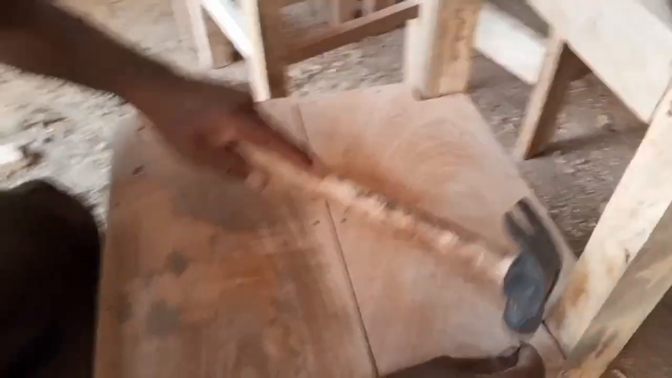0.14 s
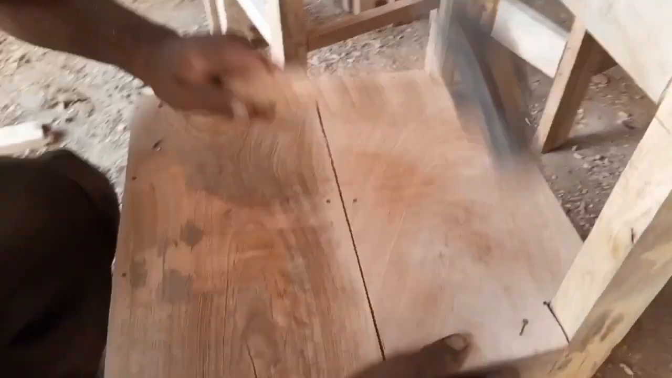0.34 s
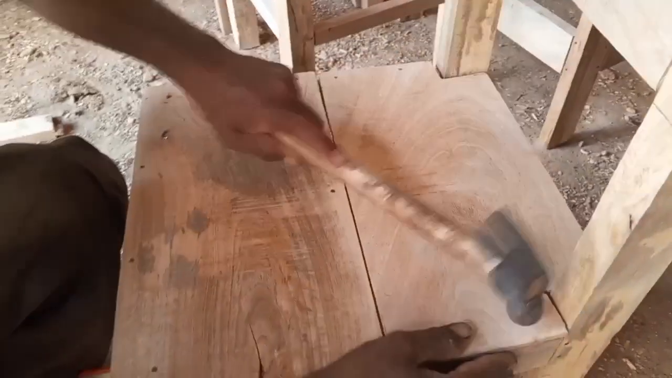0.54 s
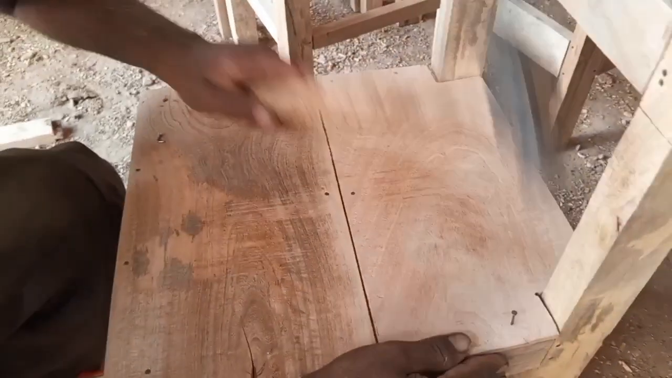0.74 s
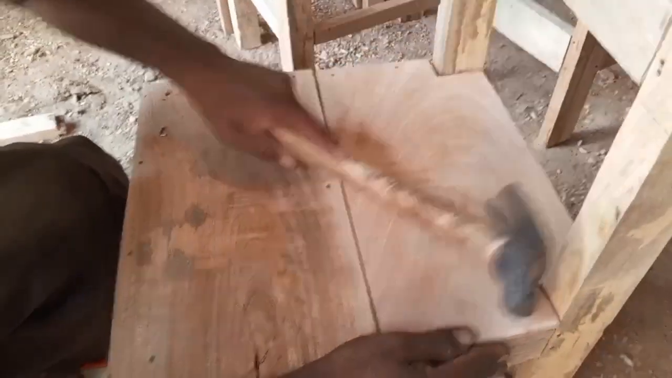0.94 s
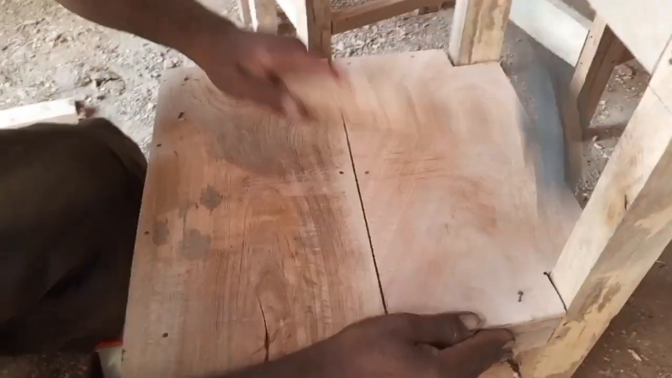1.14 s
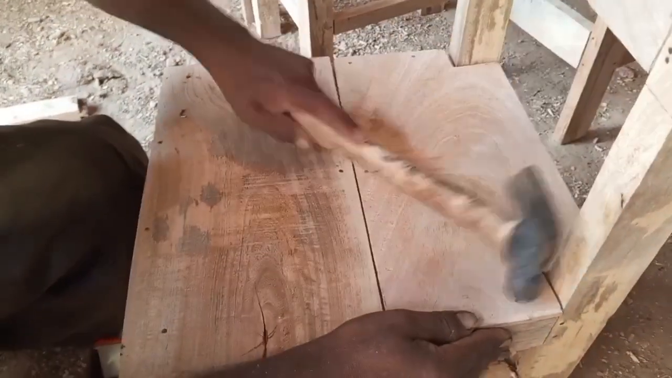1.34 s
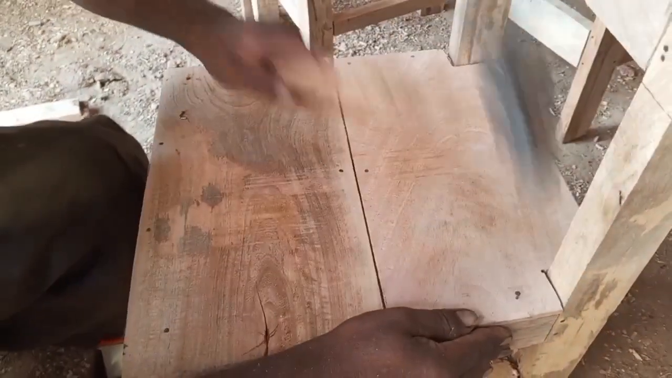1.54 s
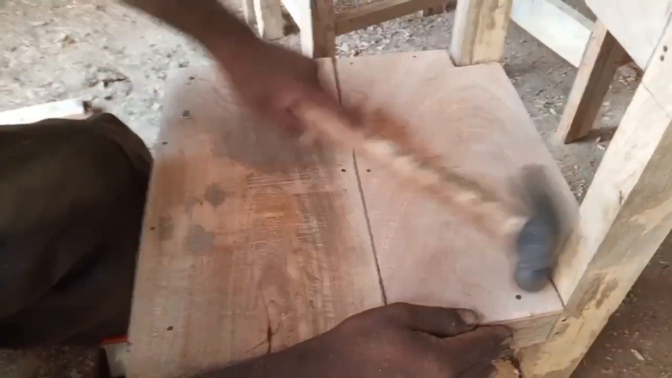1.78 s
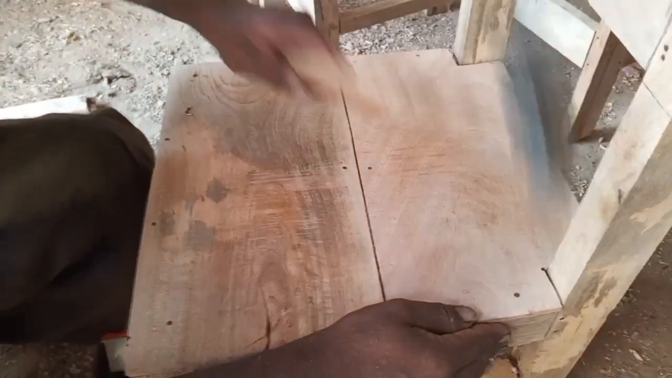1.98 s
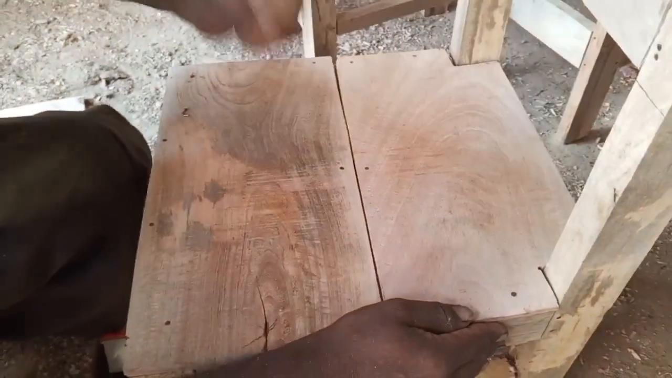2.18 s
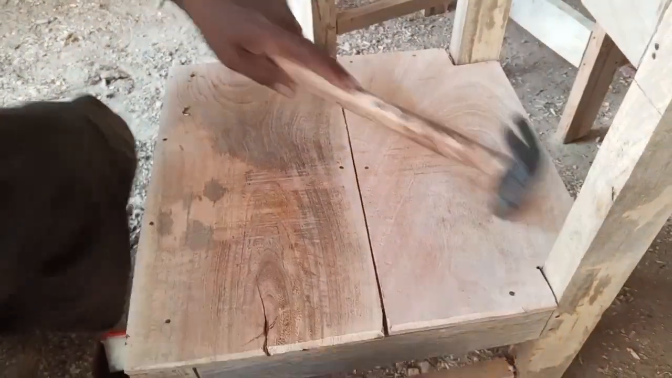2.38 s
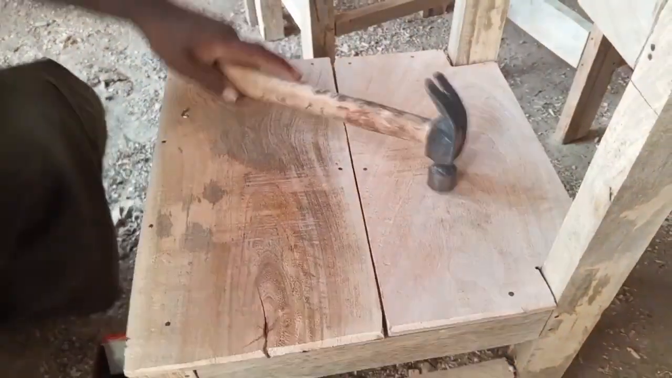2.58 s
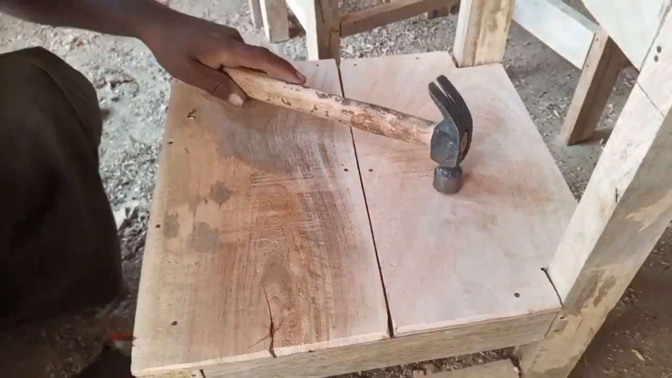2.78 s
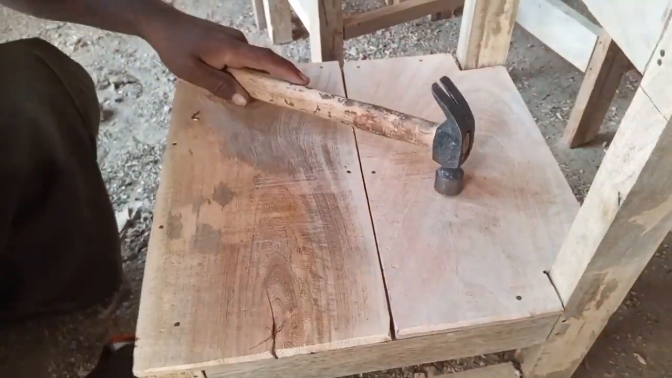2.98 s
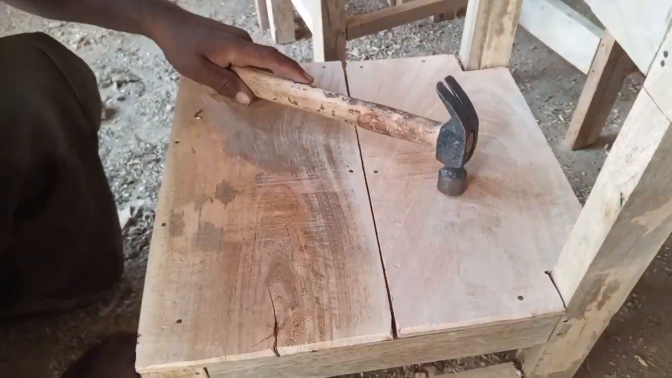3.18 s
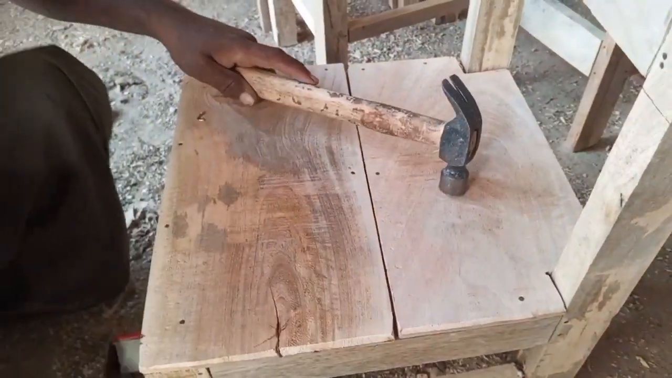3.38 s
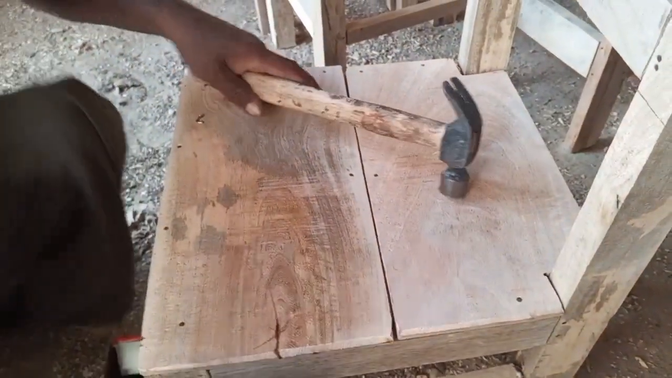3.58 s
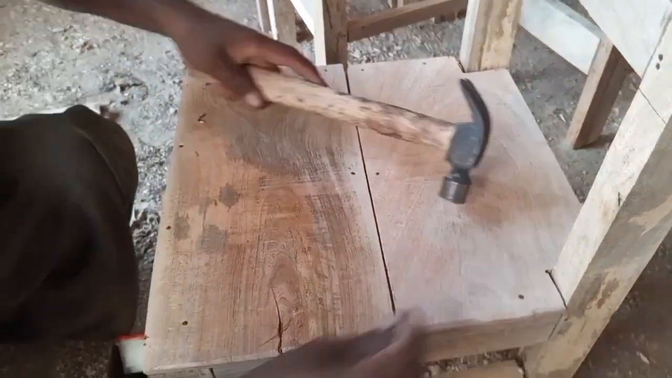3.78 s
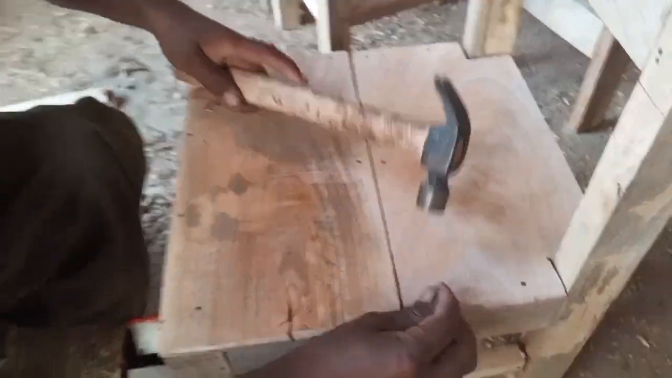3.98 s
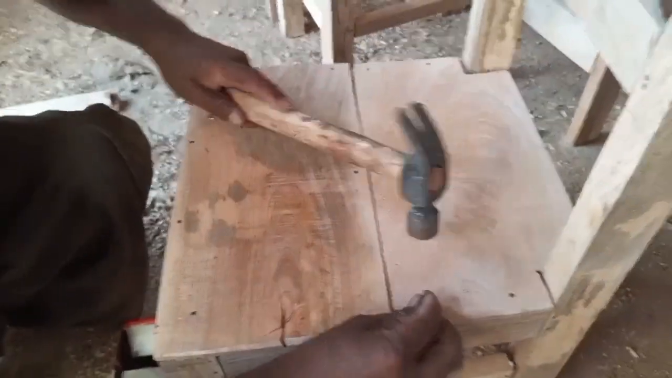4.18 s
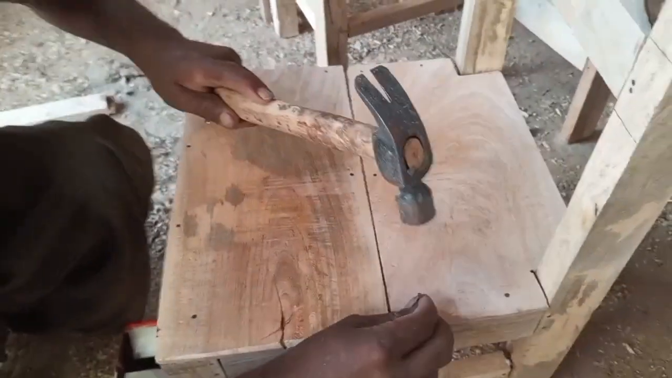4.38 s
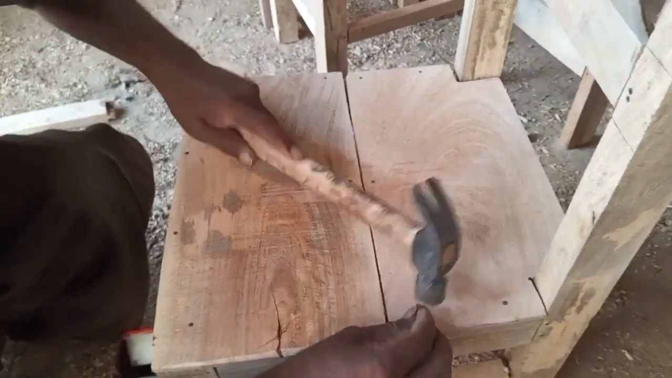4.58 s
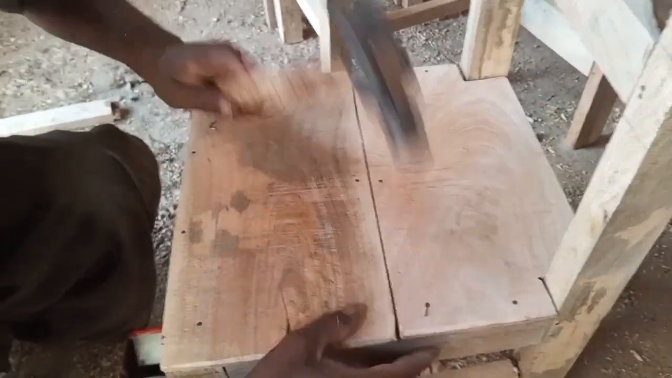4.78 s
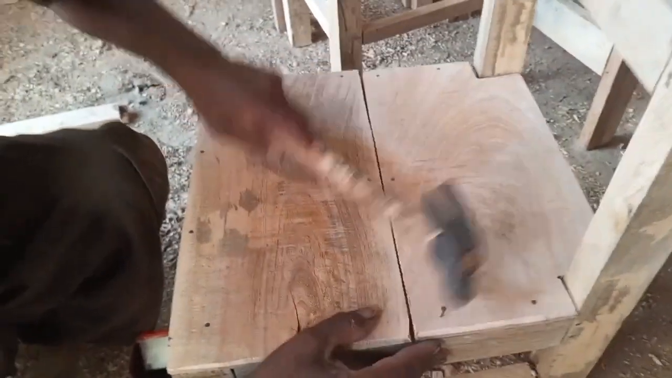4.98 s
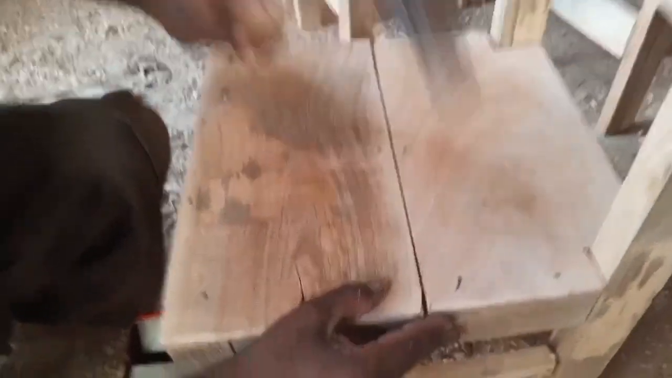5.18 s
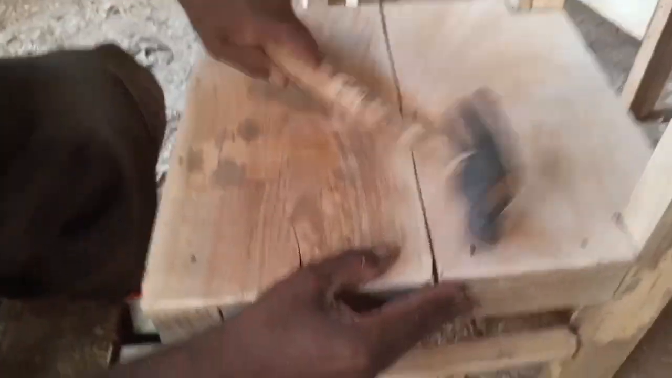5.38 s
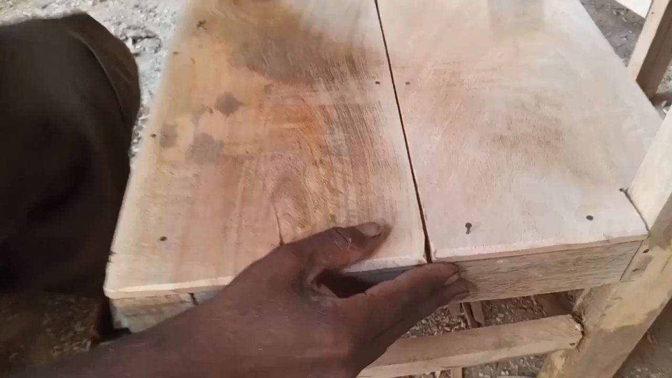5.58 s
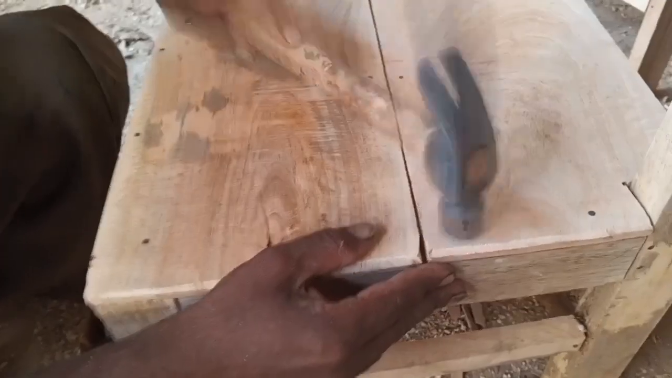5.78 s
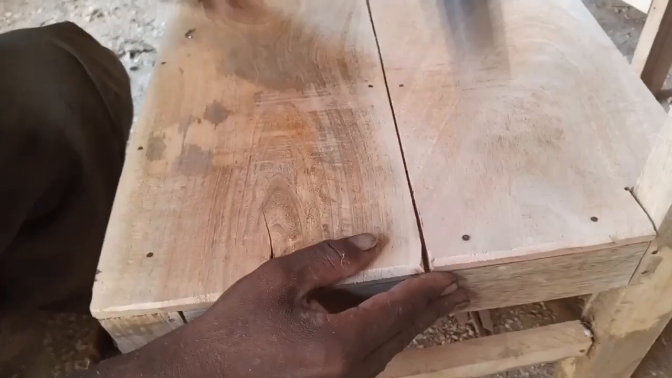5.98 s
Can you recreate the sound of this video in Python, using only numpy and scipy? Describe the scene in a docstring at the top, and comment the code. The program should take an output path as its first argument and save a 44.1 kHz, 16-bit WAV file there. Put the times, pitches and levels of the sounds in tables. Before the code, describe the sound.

Close up in an open workshop, a claw hammer strikes nails into a board seat. Six dry, hard knocks come a little under half a second apart, growing louder and crackling at the edges. The hammer is laid down softly, then there is a pause of faint wind, tiny ticks and jingling nails. Hammering resumes with a weak double tap and three strong blows, each with a small bounce and brief echo.

```python
"""Hammering nails into a chair seat

A claw hammer drives nails into the board seat of a chair in an open workshop. Each blow is a tick and
rough contact that ring seat, hammer head and frame, with a crack of noise and a decaying-noise shed echo.
Ringing touches make loose nails jingle; grains make scrapes; shaped noise and sines make yard, wind and hum.
The recorder overloads on the blows, ducks its gain and lets it rise again while the echo dies."""
import sys
import numpy as np
from scipy import signal
from scipy.fft import rfft, irfft
from scipy.io import wavfile
from scipy.ndimage import uniform_filter1d

SR = 44100
rng = np.random.default_rng(int(sys.argv[2]) if len(sys.argv) > 2 else 0)


def inscribe(sig):
    """Save sig as 16-bit PCM at rate SR to the path in sys.argv[1].

    A 1-D sig is mono; a 2-D sig holds one channel per row.
    Samples are clipped to [-1, 1] before scaling.
    """
    pcm = np.round(np.clip(np.atleast_2d(sig).T, -1, 1) * 32767)
    wavfile.write(sys.argv[1], SR, pcm.astype(np.int16))


N = 266805  # length in samples

# Hammer blows; strength_db scales the whole blow, the other levels are relative parts of it:
# start_s, strength_db, pitch_hz (nail and board), body_db (wood), crack_db, steel_db, thud_hz, thud_db,
# main_mode_db, frame_hz, frame_db, low_frame_hz, low_frame_db, boom_db, echo_db
HAMMER_BLOWS = [(.1835, 3, 1463, 11, -1, -14, 383, 4.5, 11.5, 865, -4, 407, -7, -18, -5.5),
                (.624, 8.5, 1420, 14, 2.5, -8.5, 388, -4, 8.5, 1377, 0, 690, -8.5, -26, 0.5),
                (1.049, 21.5, 1993, 12, 12.5, -41, 351, -9.5, 9.5, 1396, -6, 648, -16, -22.5, -2),
                (1.444, 13, 1344, 4.5, 6.5, -14, 410, -9, 6.5, 1420, -6.5, 666, -7, -34, 3),
                (1.869, 16, 1635, 8, 6.5, -16, 518, -11, -1.5, 1140, -16, 830, -16, -19, 0.5),
                (2.327, 29.5, 1570, 11, 10, -10.5, 448, -4, 2, 393, -10.5, 680, -21, -15, -4),
                (4.618, -4.5, 1790, 21.5, 8, -31, 548, 4, 13, 970, 5.5, 520, -8, -13, -1.5),
                (4.659, 4.5, 2090, 11.5, -3, -46, 535, -8.5, 5, 2380, -48, 1040, -29, -15.5, -41),
                (5.016, 14.5, 2150, -8, 5, -30, 510, -46, -8, 1175, -12, 2680, -9, -22.5, 0.5),
                (5.448, 26, 2590, 11.5, 9.5, -43, 494, -16, -13, 2050, -13.5, 2730, -20, -29, -7.5),
                (5.871, 12, 1980, 1, 11, -46, 382, -31, -7, 810, -4, 490, -19, -45, -4)]
# The head bounces back on to the wood after a blow:
# start_s, strength_db, pitch_hz, body_db, crack_db, thud_db, main_mode_db
HEAD_REBOUNDS = [(0.24, -13, 1520, 1, -10, -16, 0), (.650, 0.5, 840, 2, -8, -20, 0),
                 (1.921, 8, 820, -5, -21, -13, 0.5), (2.364, 10, 894, 3, -19, -10, 8),
                 (4.625, -3.5, 575, 5, -10, -6.5, -6), (5.057, 1.5, 1730, 5, -4, -27, 8),
                 (5.147, -19, 1134, 22, -10, -20, -4), (5.175, -16.5, 1200, 15.5, -5, -17, -12),
                 (5.496, 8, 824, 13.5, -2, 0, 5.5), (5.899, -13.5, 860, 9, 7, -6, -1)]
REBOUND_STEEL_DB, REBOUND_FRAME_DB, REBOUND_BOOM_DB, REBOUND_ECHO_DB = -45, -16, -7, -3
REBOUND_THUD_HZ = 435
# Modes of the seat boards: mode_hz, level_db (relative), t60_s
SEAT_MODES = [(403, -22, 0.27), (472, -20, 0.047), (636, 12, 0.036), (858.6, 14, 0.051), (1155, -13, 0.49),
              (1400, -15, 0.026), (1658, 13, 0.037), (2106, 22, 0.016), (2575, 16, 0.022),
              (2840, 23, 0.011), (3000, -40, 0.026)]
MAIN_MODE = 3  # row of the seat modes that takes main_mode_db
# Modes of the hammer head and handle: mode_hz, level_db (relative), t60_s
HEAD_MODES = [(868.8, -35, 0.45), (2370, -46, .4), (6480, -13.5, 0.017), (11390, -55, .06),
              (14300, -34, 0.06), (5480, -47, 0.45)]
# Boom of the whole chair: mode_hz, level_db (relative), t60_s
CHAIR_BOOM = [(123.8, -4, 0.23), (155, 0, 0.096), (223, -7, 0.1), (266.4, -9.5, .12)]
CONTACT_DB = -10  # how hard a contact drives a mode
THUD_T60_S, KNOCK_LONGEST_S = 0.041, 0.035  # ring of the low thud; longest t60 of the knock
KNOCK_ECHO_DB = 0.5  # extra level of the pitched knock in the echo send
FRAME_T60_S, FRAME_RING_CYCLES = 0.45, 28.0  # how long the frame is shaken; its ring in cycles
RATTLE_ROUGH_DB = 3.5  # RMS unevenness of the frame's rattle

# Echo of the shed: centre_hz, t60_s
SHED_DECAY = [(100, 0.28), (500, 0.28), (2000, 0.25), (5000, 0.24), (9000, 0.11), (15000, 0.21)]
SHED_DB = -17

# Hammer laid on the seat: start_s, strength_db, brightness_db (per octave)
HAMMER_SET_DOWN = [(2.815, -41, 9.5), (2.829, -29, 3)]
# Modes of the hammer resting on the damped seat: mode_hz, level_db (relative), t60_s
RESTING_MODES = [(613, -6.5, 0.12), (710, 7, 0.04), (1750, -8.5, 0.026), (2350, -9, 0.021)]
SET_DOWN_CONTACT_S = 0.0035

# Hammer face dragged over the board: peak_s, peak_db, rise_s, fall_s
FACE_DRAG = [(2.968, -53.5, 0.012, 0.029), (3.006, -51.5, 0.02, 0.021)]
# Chair shifted on the ground: peak_s, peak_db, rise_s, fall_s
CHAIR_SHIFT = [(5.73, -38, 0.015, 0.03), (5.77, -39, 0.02, 0.03), (5.81, -43, 0.02, 0.025)]
# Dry ticks close to the microphone: start_s, level_db (click before its filter)
CLOSE_TICKS = [(0.513, -40), (2.9911, -47), (3.0115, -28.5), (3.03, -48), (3.1353, -44), (3.1414, -42),
               (3.1544, -64)]

# Modes of the loose nails: mode_hz (of the onset ring), level_db (relative), t60_s
NAIL_MODES = [(4900, -5, .08), (5050, -6, .08), (5280, -6, .08), (6070, -7, .08), (6470, -1, .1),
              (7070, -8, .07), (7270, -7, .07), (7630, -2, .08), (8380, -6, .07), (8600, 0, .1),
              (9230, -2, .08), (9370, -6, .07), (9710, -3, .08), (9975, 0, .1), (10760, -1, .08),
              (11270, -5, .07), (11370, -2, .1)]
# Jingling spells: start_s, end_s, level_db
JINGLE_SPELLS = [(0, 0.185, -62.5), (1.15, 1.435, -57.5), (1.503, 1.757, -60), (3.435, 4.053, -59.5),
                 (5.155, 5.455, -62.5), (5.596, 5.886, -68)]

# Faint narrow tones that swell and stop: peak_s, peak_db, rise_s, fall_s, pitch_hz
TONE_SWELLS = [(1.4, -54, 0.029, 0.019, 1400), (2.78, -52, 0.048, 0.016, 970),
               (0.393, -53.5, 0.066, 0.018, 330)]

# Gusts on the microphone, on top of the steady breeze: peak_s, peak_db, rise_s, fall_s
WIND_GUSTS = [(.27, -48.5, 0.12, 0.042), (.77, -47, 0.11, 0.1), (1.58, -46, 0.064, 0.03),
              (2.04, -58, 0.11, 0.015), (2.62, -49.5, 0.048, 0.1), (4.7, -50, 0.035, 0.027),
              (5.12, -52, 0.11, 0.082), (5.38, -54, 0.13, 0.089), (5.7, -46.5, 0.3, 0.66)]
BREEZE_DB = -59.5
# Gusts that thump the microphone: start_s, peak_db, pitch_hz
WIND_THUMPS = [(3.31, -39, 85), (3.409, -50, 61.9), (3.574, -50.5, 84.5), (3.659, -44.5, 83),
               (4.025, -46, 79), (4.091, -42, 74.4), (4.242, -41.5, 73.4), (5.169, -34, 96)]
# Low hums: peak_s, peak_db, rise_s, fall_s, pitch_hz
LOW_HUM = [(5.81, -37, 0.19, 0.05, 58), (5.98, -38, .06, .08, 60), (5.68, -39, .12, .07, 112),
           (5.36, -45, .1, .07, 97)]
HUM_WIDTH_HZ = 6.0  # twice the RMS wander of its pitch
# A far hiss near 1.8 kHz: peak_s, peak_db, rise_s, fall_s
HISS_SWELL = [(3.3, -56, 0.8, 0.98)]
# Yard noise level over time: time_s, level_db
YARD_LEVEL = [(0.0, -57.5), (6.05, -52.5)]
# Yard noise colour: frequency_hz, density_db (relative, per Hz)
YARD_COLOUR = [(60, -8), (120, 14.5), (300, 10.5), (800, 8.5), (1750, 5), (2500, 4.5), (3200, -1.5),
               (5000, -7), (8000, -11.5), (11000, -16), (13000, -32), (16000, -45)]

CUTOFF_HZ = 17000  # the recorder's top cut


def blows(rows, ring_db, cycles):
    """A tick and a few ms of rough contact ring wood and steel; returns near sound and echo send."""
    out = np.zeros((2, N + SR))
    t = np.arange(SR // 2) / SR
    # steel meets steel over a fraction of a ms
    tick = np.where(t < 0.0004, np.sin(np.pi * t / 0.0004) ** 2, 0)
    tick /= tick.sum()
    for (s, strength_db, hz, body_db, crack_db, steel_db, thud_hz, thud_db, main_db,
         frame_hz, frame_db, low_hz, low_db, boom_db, echo_db) in rows:
        rough = rng.standard_normal((2, len(t))) * np.exp(-t / 0.0021) * (1 - np.exp(-t / 0.0052))
        rough /= np.sqrt(np.sum(rough[0] ** 2))
        contact = 0.097 * tick + 0.36 * band(rough[0], 330, 4400)

        knock = strike(contact, hz, min(cycles / hz, KNOCK_LONGEST_S))
        thud = amp(thud_db) * strike(tick, thud_hz, THUD_T60_S)
        body = rms_one(band(band(rough[1], 920, 2870), 480, 3320)) / np.sqrt(len(t))
        crack = amp(crack_db) * band(rough[1], 5230, 8640)
        seat = seat_ring(contact, hz, ring_db, main_db)
        steel = sum(amp(steel_db + db) * ring(rough[0], mode_hz, t60) for mode_hz, db, t60 in HEAD_MODES)
        boom = sum(amp(db) * strike(tick, mode_hz, t60) for mode_hz, db, t60 in CHAIR_BOOM)
        hit = thud + amp(body_db) * body + seat + crack + steel + amp(boom_db) * boom
        frame = amp(frame_db) * rattle(t, frame_hz) + amp(low_db) * rattle(t, low_hz)

        near = knock + hit + frame
        far = amp(echo_db) * (amp(KNOCK_ECHO_DB) * knock + hit)
        at = round(s * SR)
        out[:, at:at + len(t)] += amp(strength_db) * np.array([near, far])
    return signal.sosfilt(signal.butter(3, 190, "high", fs=SR, output="sos"), out[:, :N])


def rebounds():
    """Rows for the head's bounces, laid out like blows; the lower rattle is an octave down."""
    return [(s, db, hz, body_db, crack_db, REBOUND_STEEL_DB, REBOUND_THUD_HZ, thud_db, main_db,
             hz, REBOUND_FRAME_DB, hz / 2, REBOUND_FRAME_DB, REBOUND_BOOM_DB, REBOUND_ECHO_DB)
            for s, db, hz, body_db, crack_db, thud_db, main_db in HEAD_REBOUNDS]


def seat_ring(contact, hz, ring_db, main_db):
    """Seat modes ring under the contact; those far from the blow's pitch are barely driven."""
    out = 0
    for k, (mode_hz, mode_db, t60) in enumerate(SEAT_MODES):
        near_db = -7 * abs(np.log2(mode_hz / hz))
        level_db = ring_db + mode_db + near_db + main_db * (k == MAIN_MODE) + rng.normal(0, 1.0)
        out = out + amp(level_db) * strike(contact, mode_hz, t60)
    return out


def strike(contact, hz, t60):
    """One mode rung by a contact, with an energy that does not hang on the contact's chance colour."""
    energy = t60 * SR / (4 * np.log(1000))  # of a decaying sine of height 1
    return amp(CONTACT_DB) * rms_one(ring(contact, hz, t60)) * np.sqrt(energy / len(contact))


def rattle(t, hz):
    """The shaken frame rattles unevenly in one resonance; unit energy."""
    uneven = amp(RATTLE_ROUGH_DB * rms_one(band(rng.standard_normal(len(t)), 8.5, 74)))
    envelope = amp(-60 * t / FRAME_T60_S) * (1 - np.exp(-t / 0.0047))
    shake = uneven * rng.standard_normal(len(t)) * envelope
    return rms_one(ring(shake, hz, FRAME_RING_CYCLES / hz)) / np.sqrt(len(t))


def shed(x):
    """Dense echo: noise that builds up over tens of ms and dies at its own rate in each half octave."""
    t = np.arange(int(0.8 * SR)) / SR
    edges = 60 * 2 ** np.arange(0, 8.4, 0.5)
    echo = 0
    for low, high in zip(edges, edges[1:]):
        t60 = at_hz(SHED_DECAY, np.sqrt(low * high))
        echo = echo + band(rng.standard_normal(len(t)), low, high) * amp(-60 * t / t60)
    echo *= 1 - np.exp(-t / 0.07)
    return signal.fftconvolve(x, echo / np.sqrt(np.sum(echo ** 2)))[:N]


def set_down():
    """Each mode of the resting hammer swells over the soft contact, then dies."""
    out = 0
    for s, strength_db, bright_db in HAMMER_SET_DOWN:
        t = np.maximum(np.arange(N) / SR - s, 0)
        onset = np.minimum(t / SET_DOWN_CONTACT_S, 1)
        for hz, db, t60 in RESTING_MODES:
            tilt_db = bright_db * np.log2(hz / RESTING_MODES[1][0])
            level = amp(strength_db + db + tilt_db - 60 * t / t60)
            out = out + level * onset * np.sin(2 * np.pi * hz * t + rng.uniform(0, 2 * np.pi))
    return out


def grains(per_s):
    """Random impulses of random height, so many a second on average."""
    return rng.standard_normal(N) * (rng.random(N) < per_s / SR)


def drag():
    """Dense grains excite the steel as the hammer face drags over the board."""
    g = grains(900)
    steel = band(g, 2030, 2700) * 2.6 + ring(g, 4770, 0.016) * 0.032 + ring(g, 6500, 0.009) * 0.019
    return swell(FACE_DRAG) * rms_one(steel)


def chair_shift():
    """Denser grains ring the seat as the chair shifts, its lower modes strongest."""
    g = grains(3000)
    seat = sum((600 / hz) ** 0.8 * ring(g, hz, 0.035) for hz, _, _ in SEAT_MODES)
    return swell(CHAIR_SHIFT) * rms_one(seat)


def close_ticks():
    """Single clicks, band-passed and left dry."""
    ticks = np.zeros(N)
    for s, db in CLOSE_TICKS:
        ticks[round(s * SR)] = amp(db)
    return band(ticks, 7200, 16000)


def jingle():
    """Nails touch densely at random; each touch swells and fades in one mode, over a haze of high noise."""
    t, out = np.arange(N) / SR, 0
    level = sum(amp(db) * np.clip(np.minimum(t - start, end - t) / 0.02, 0, 1)
                for start, end, db in JINGLE_SPELLS)
    for hz, mode_db, t60 in NAIL_MODES:
        touches = (rng.random(N) < 70.0 / SR) * amp(rng.normal(-5, 3.5, N)) * rng.choice([-1, 1], N)
        # a short first ring softens the onset; the second is tuned slightly sharp of it
        soft = ring(level * touches, hz, 0.03) * 15 / (0.03 * SR)
        out = out + amp(mode_db) * ring(soft, hz * 1.002, t60)
    haze = uniform_filter1d(level, size=2000) * rms_one(band(rng.standard_normal(N), 8400, 8700))
    return out + amp(-11) * haze


def faint_tones():
    """Narrow noise at each pitch under its swell."""
    return sum(swell([row]) * rms_one(ring(rng.standard_normal(N), hz, 0.21)) for *row, hz in TONE_SWELLS)


def wind():
    """Lumpy low rumble: a steady breeze plus gusts."""
    lumps = amp(3.3 * rms_one(band(rng.standard_normal(N), 17, 19)))
    rumble = rms_one(band(lumps * rng.standard_normal(N), 72.5, 142))
    return rumble * (amp(BREEZE_DB) + swell(WIND_GUSTS))


def thumps():
    """Single soft thumps: low sines under short bells that peak 15 ms after the start."""
    t = np.arange(N) / SR
    return sum(amp(db) * np.exp(-((t - s - 0.015) / 0.018) ** 2) * np.sin(2 * np.pi * hz * (t - s))
               for s, db, hz in WIND_THUMPS)


def hum():
    """Low sines whose pitch wanders together, each under its swell."""
    t = np.arange(N) / SR
    waver = np.cumsum(HUM_WIDTH_HZ / 2 * rms_one(band(rng.standard_normal(N), 2.5, 11))) / SR
    return sum(swell([row]) * np.sqrt(2) * np.sin(2 * np.pi * (hz * t + waver)) for *row, hz in LOW_HUM)


def yard():
    """Smooth far noise shaped by its colour, with a narrow far hiss."""
    hz = np.maximum(np.fft.rfftfreq(N, 1 / SR), 1)
    far = rms_one(irfft(rfft(rng.standard_normal(N)) * amp(at_hz(YARD_COLOUR, hz)), N))
    hiss = rms_one(band(rng.standard_normal(N), 1595, 2130))
    return amp(curve(YARD_LEVEL)) * far + swell(HISS_SWELL) * hiss


def amp(db):
    """Decibels to amplitude factor."""
    return 10 ** (np.asarray(db) / 20)


def rms_one(x):
    """Scale to an RMS of one."""
    return x / np.sqrt(np.mean(x ** 2) + 1e-20)


def curve(rows):
    """Level in dB at every sample; silent outside the rows."""
    s, level = np.transpose(rows)
    return np.interp(np.arange(N) / SR, s, level, left=-150, right=-150)


def swell(rows):
    """Sum of bell-shaped gains, each with its own rise and fall."""
    t = np.arange(N) / SR
    return sum(amp(db) * np.exp(-((t - s) / np.where(t < s, rise_s, fall_s)) ** 2)
               for s, db, rise_s, fall_s in rows)


def at_hz(points, hz):
    """Read a table at a frequency, along a logarithmic frequency axis."""
    table_hz, value = np.transpose(points)
    return np.interp(np.log(hz), np.log(table_hz), value)


def ring(clicks, hz, t60):
    """A resonator: a unit click sets a decaying sine of height 1 ringing."""
    r, w = amp(-60 / (t60 * SR)), 2 * np.pi * hz / SR
    return signal.lfilter([0, np.sin(w)], [1, -2 * r * np.cos(w), r * r], clicks + 1e-18)


def band(x, low_hz, high_hz):
    """Band-pass filter."""
    return signal.sosfilt(signal.butter(2, [low_hz, high_hz], "band", fs=SR, output="sos"), x)


def bell(x, hz, width_hz, gain_db):
    """Bell equaliser: a peak or notch of the given gain."""
    a, w = amp(gain_db / 2), 2 * np.pi * hz / SR
    q = np.sin(w) * width_hz / hz / 2
    middle = -2 * np.cos(w)
    return signal.lfilter([1 + q * a, middle, 1 - q * a], [1 + q / a, middle, 1 - q / a], x)


def smooth(x, time_s):
    """One-pole smoothing with the given time constant."""
    r = np.exp(-1 / (time_s * SR))
    return signal.lfilter([1 - r], [1, -r], x)


def gain_control(x, threshold_db, share, release_db_s, attack_s, sense_s):
    """Gain falls by a share of the level above the threshold, a little late, and climbs back steadily."""
    level = 10 * np.log10(smooth(x ** 2, sense_s) + 1e-12)
    climb = release_db_s * np.arange(N) / SR
    cut = np.clip(share, 0, 1) * np.maximum(level - threshold_db, 0)
    cut = np.maximum.accumulate(cut + climb) - climb
    return x * amp(-smooth(cut, attack_s))


def suppressor(x, floor_db, span_db, depth_db, sense_s):
    """Louder sound is lifted against sound near the noise floor, so tails end abruptly."""
    level = 10 * np.log10(smooth(band(x, 300, 3300) ** 2, sense_s) + 1e-12)
    return x * amp(depth_db * np.clip((level - floor_db) / span_db, 0, 1))


def scene():
    """Blows and their echo in front, small handling sounds, then wind and yard behind."""
    near, far = blows(list(HAMMER_BLOWS) + rebounds(), ring_db=-19.5, cycles=53.0)
    hammering = near + amp(SHED_DB) * shed(far)
    handling = set_down() + drag() + chair_shift() + close_ticks() + jingle()
    background = faint_tones() + wind() + thumps() + hum() + yard()
    return (hammering + handling + background)[None]


def record(dry):
    """Microphone port tone, two gain controls, noise suppressor, overload, bass and top cut."""
    # the port has a deep dip at 4 kHz and a peak above
    dip = signal.sosfilt(signal.butter(2, [3250, 4700], "stop", fs=SR, output="sos"), dry[0])
    x = bell(dip + amp(-15.5) * dry[0], 6770, 1300, 6.8)
    # a quick gain control, then a slower one
    x = gain_control(x, threshold_db=-34.5, share=0.42, release_db_s=877, attack_s=0.0001, sense_s=0.000067)
    x = gain_control(x, threshold_db=-28.5, share=0.73, release_db_s=332.5, attack_s=0.016, sense_s=0.0078)
    x = suppressor(x, floor_db=-43.0, span_db=1.5, depth_db=4.0, sense_s=0.013)
    x = x / (1 + np.abs(x / 0.63) ** 6) ** (1 / 6)  # overload rounds peaks off towards 0.63
    x = signal.sosfilt(signal.butter(2, 38, "high", fs=SR, output="sos"), x)
    return signal.sosfilt(signal.cheby2(12, 60, CUTOFF_HZ, fs=SR, output="sos"), x)[None]


dry = scene()
out = record(dry)
inscribe(out)
```